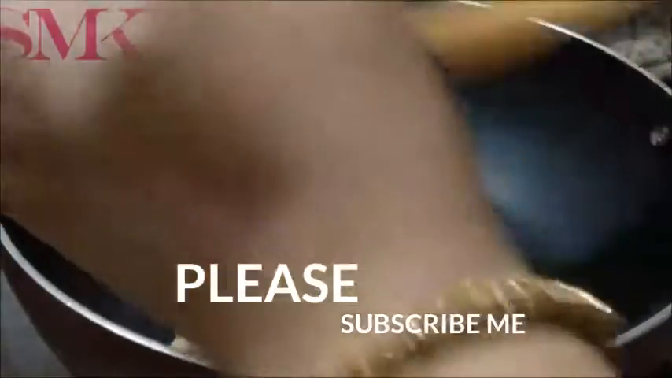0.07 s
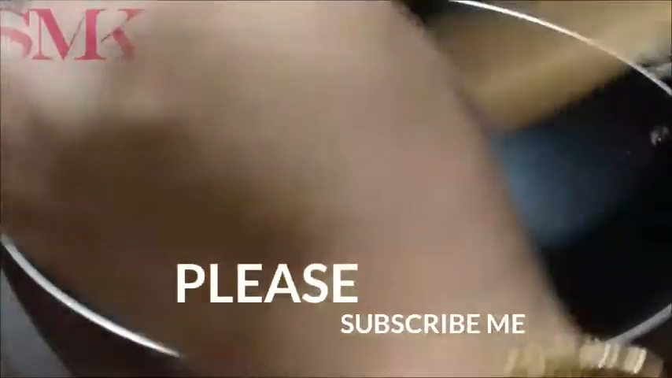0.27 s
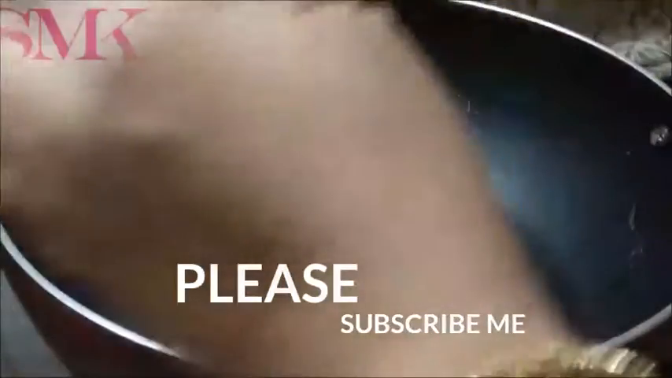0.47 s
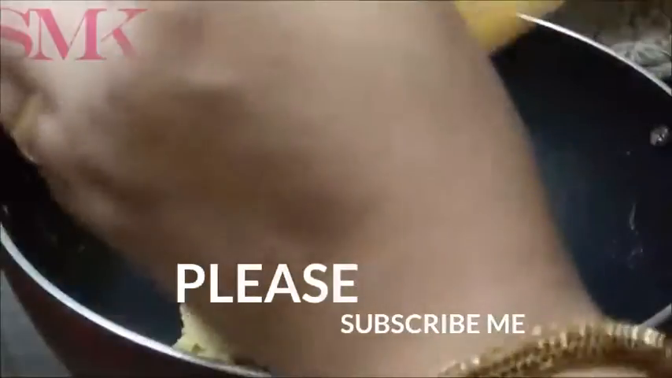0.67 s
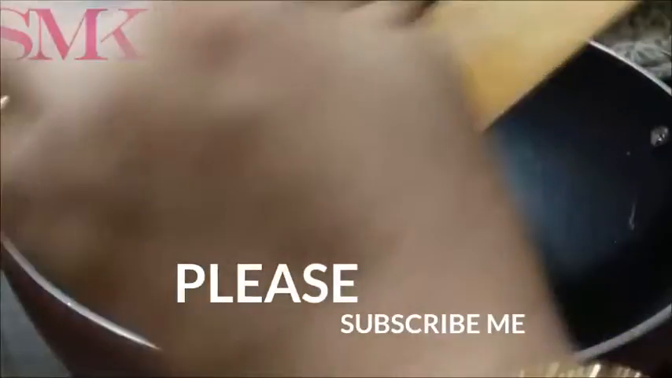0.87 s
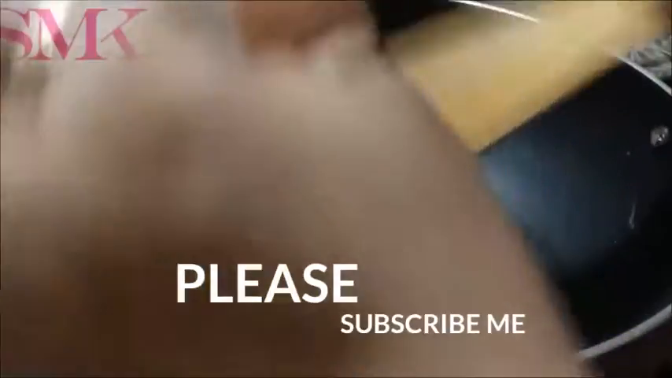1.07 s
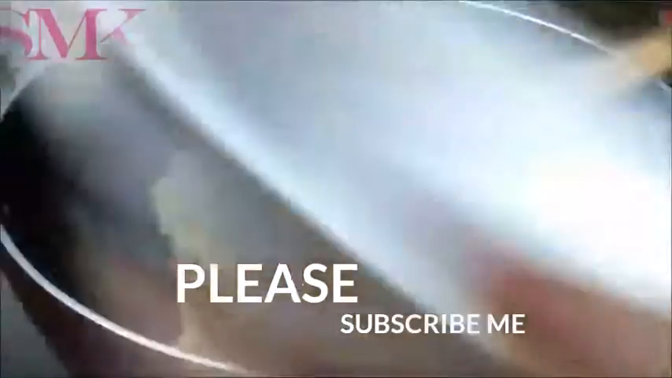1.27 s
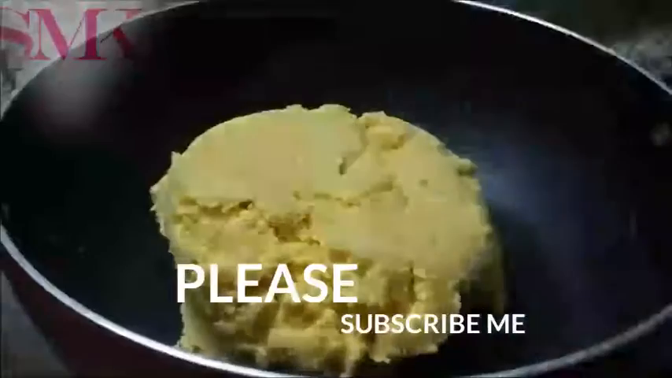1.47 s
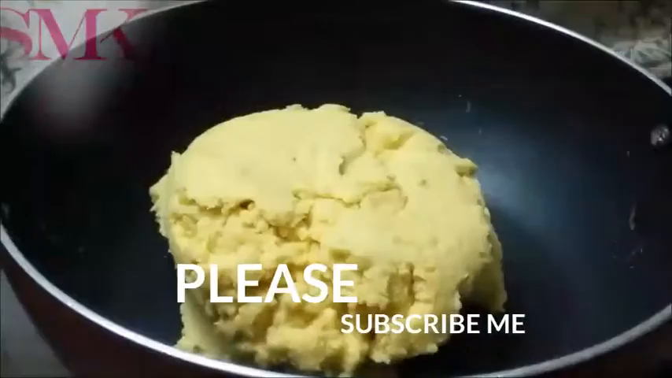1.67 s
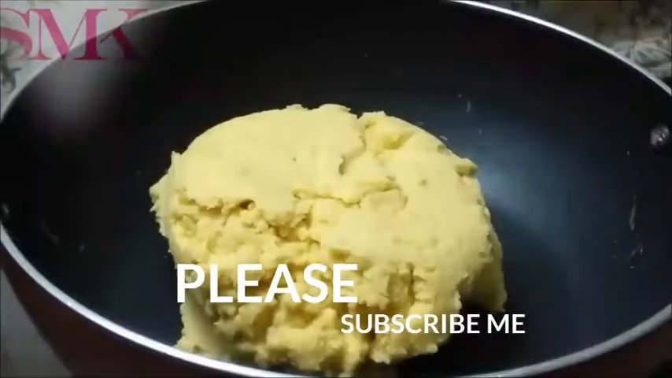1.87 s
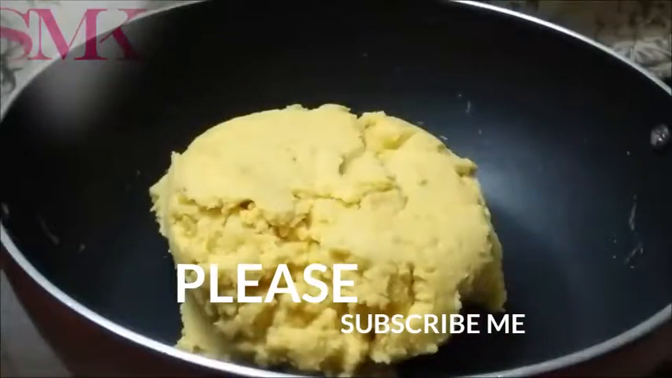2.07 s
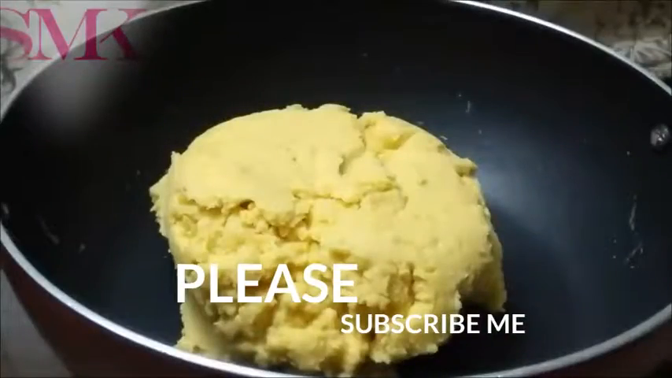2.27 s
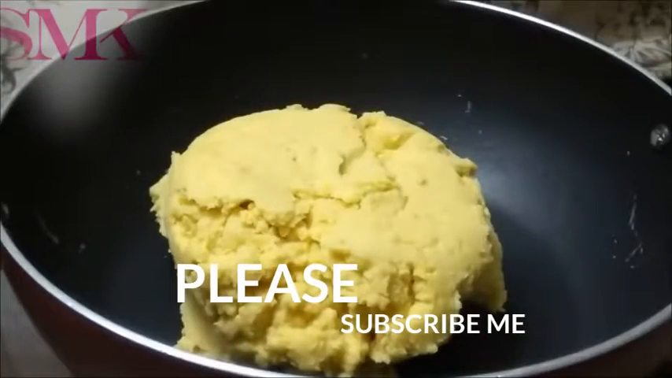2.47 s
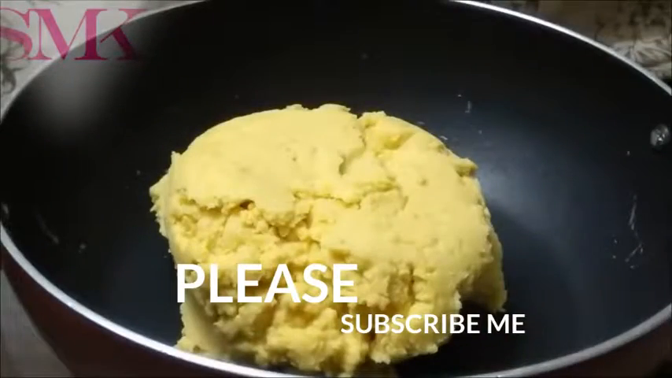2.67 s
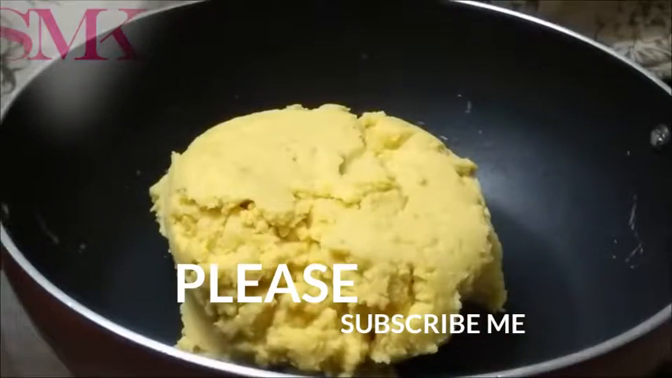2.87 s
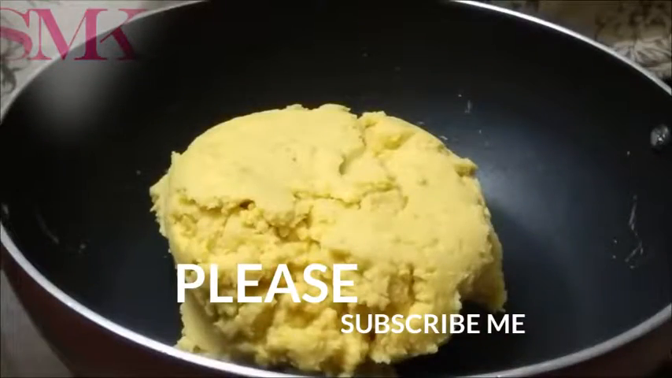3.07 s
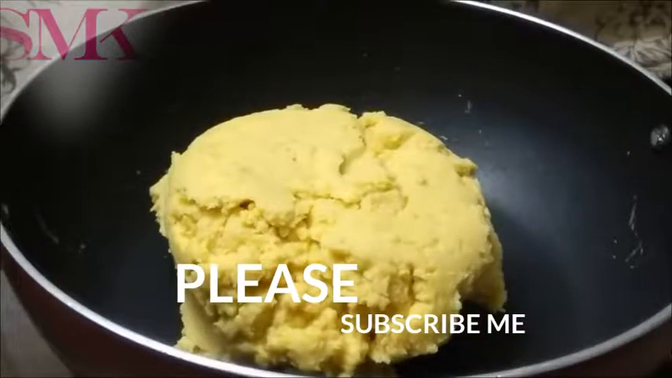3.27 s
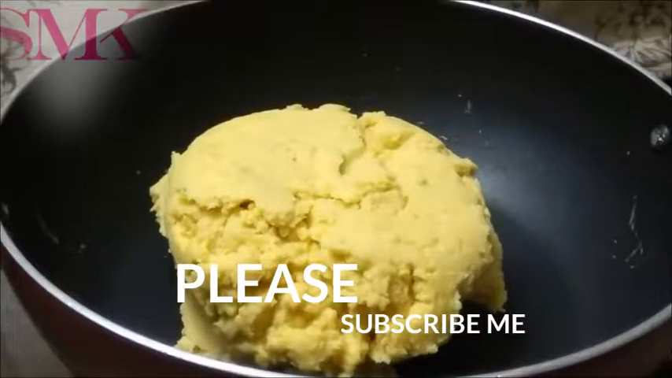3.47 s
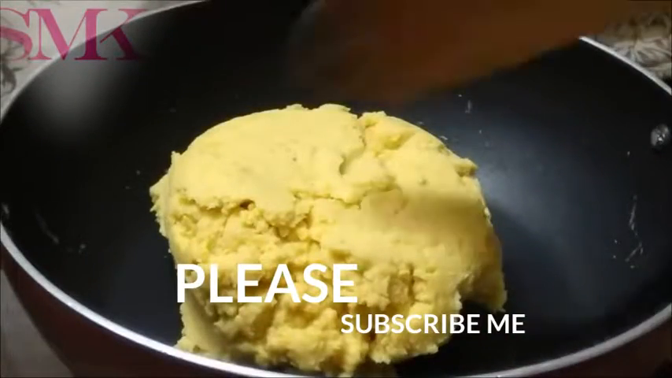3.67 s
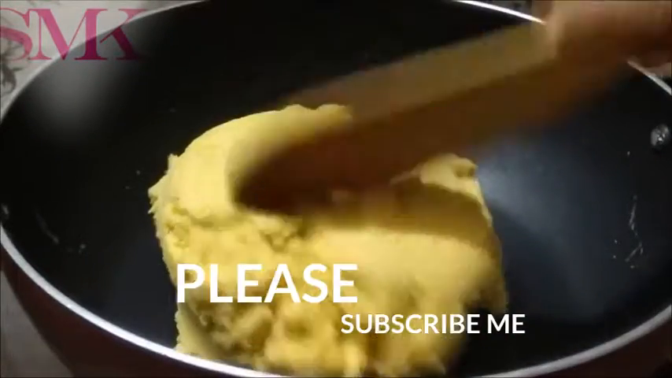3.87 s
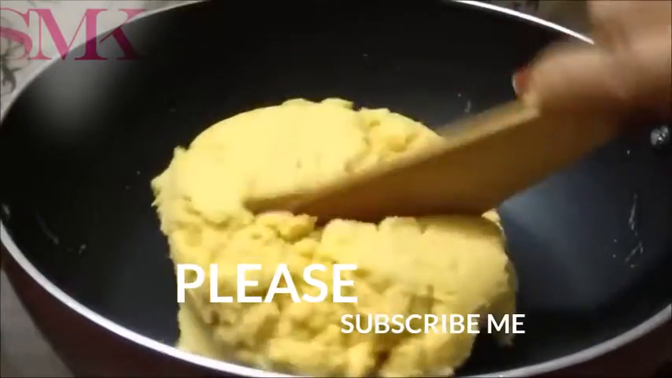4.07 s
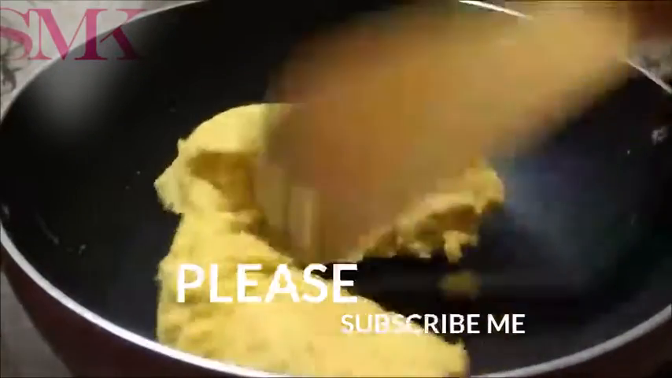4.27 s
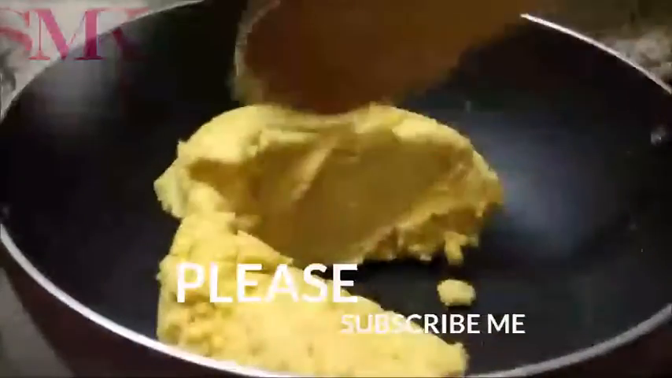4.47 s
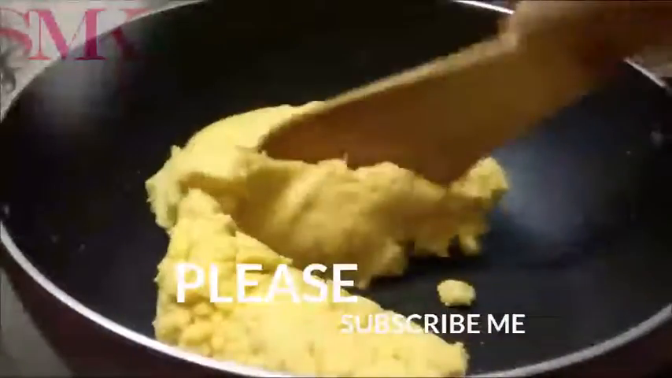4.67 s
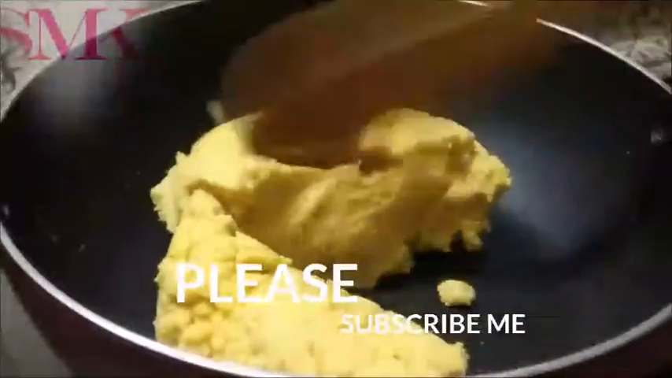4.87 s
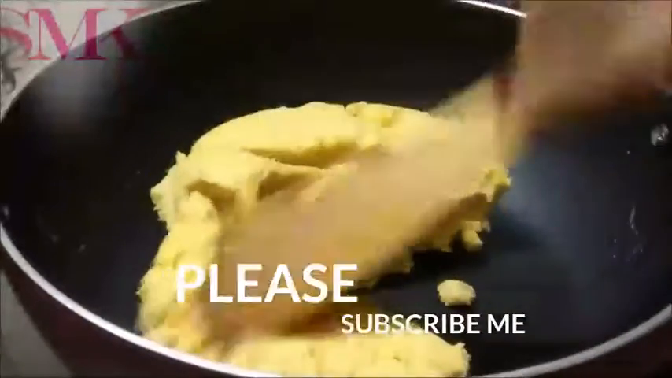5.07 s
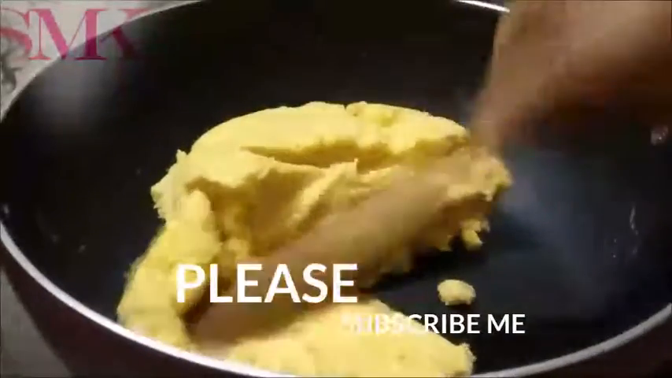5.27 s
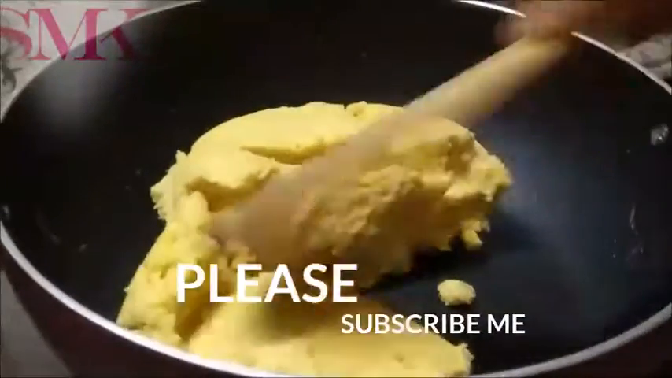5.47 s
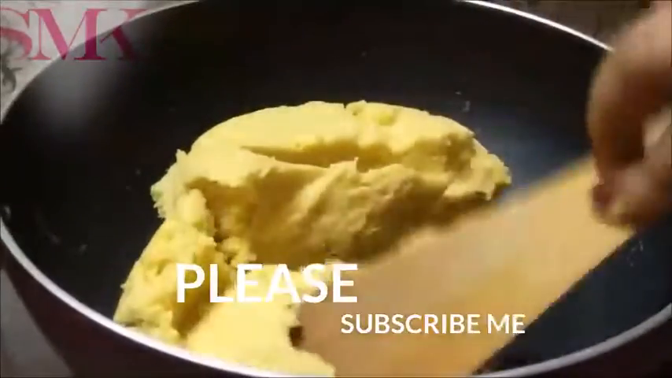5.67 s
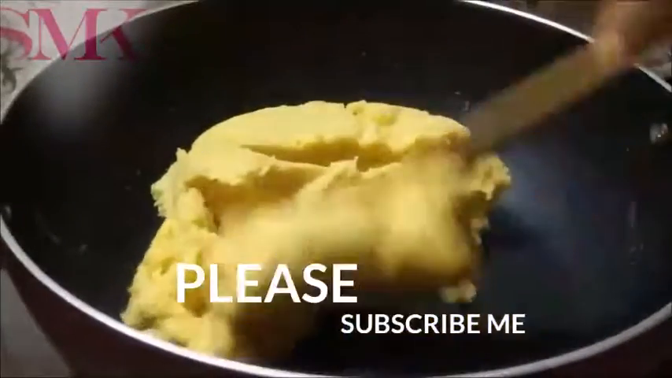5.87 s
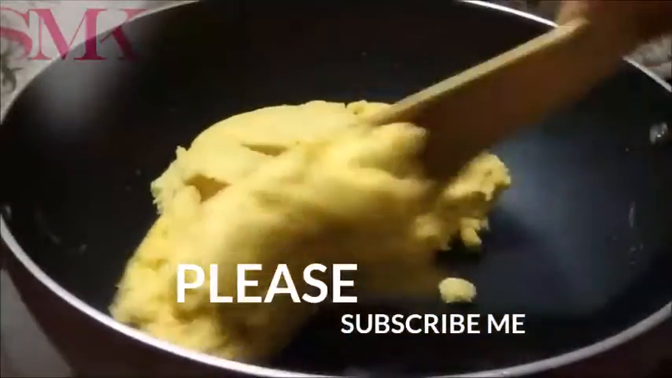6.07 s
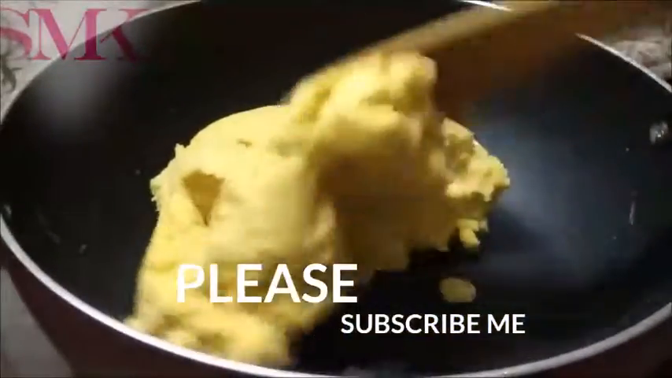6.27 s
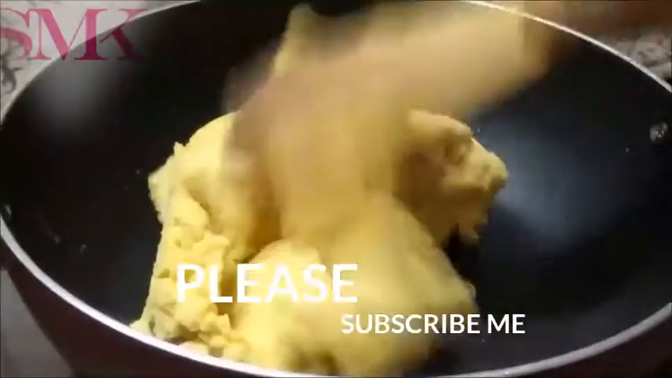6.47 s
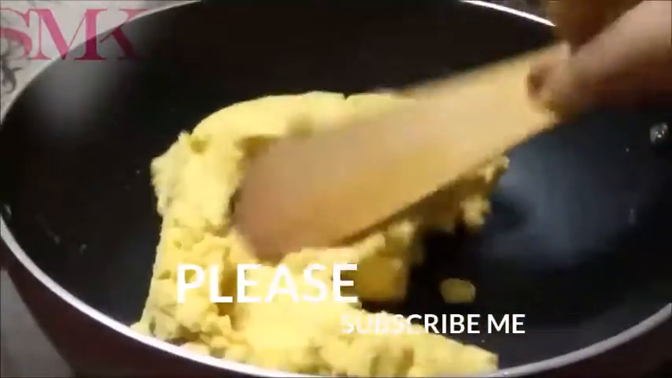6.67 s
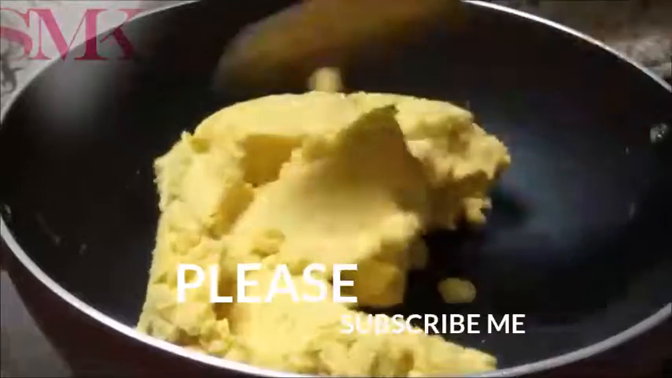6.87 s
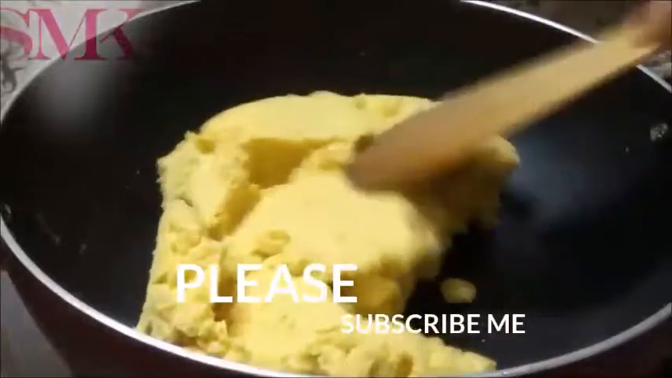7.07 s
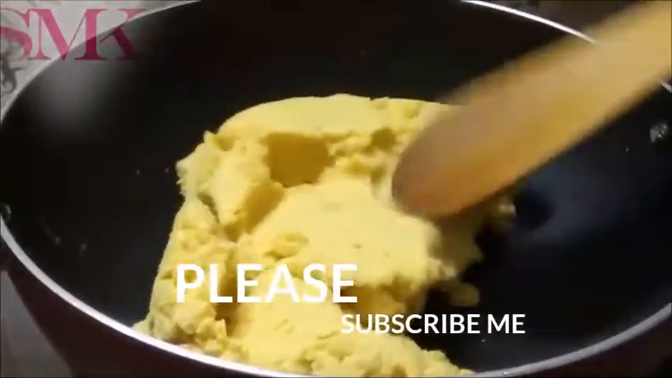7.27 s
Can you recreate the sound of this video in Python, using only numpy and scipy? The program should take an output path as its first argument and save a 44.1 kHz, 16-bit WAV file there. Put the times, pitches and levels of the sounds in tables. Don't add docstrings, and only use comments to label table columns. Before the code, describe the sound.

Close kitchen cooking: hissing paste, one hard wooden rap, two bright steel clanks, a lull, then juddering spatula knocks with bursts of steam.

```python
import sys
import numpy as np
from scipy import signal
from scipy.fft import rfft, irfft, next_fast_len
from scipy.io import wavfile
from scipy.ndimage import uniform_filter1d

SR = 44100
rng = np.random.default_rng(int(sys.argv[2]) if len(sys.argv) > 2 else 0)


def amplitude_ratio(level_db):
    exponent = np.asarray(level_db, float) / 20
    return 10 ** exponent


def put_to_file(sound):
    columns = np.atleast_2d(sound).T
    safe = np.clip(columns, -1, 1)
    whole_steps = np.round(safe * 32767)
    wavfile.write(sys.argv[1], SR, whole_steps.astype(np.int16))


N = 322371
T = np.arange(N) / SR
SLOW = T[::64]

# start in seconds, peak in dB, contact in ms.
SLIPS = [(0.34, -20.5, 0.77), (0.354, -20.5, 1), (0.37, -24.5, 0.89), (4.143, -11.5, 0.14),
         (4.153, -10.5, 0.6), (4.1645, -11, 0.35), (4.174, -15, 0.093), (4.1875, -11, 0.32),
         (4.196, -35, 0.86), (4.2118, -11, 0.44), (4.227, -28, 0.67), (4.243, -29, 0.87),
         (4.281, -12.5, 0.72), (4.293, -15, 0.8), (4.309, -23.5, 0.44), (4.325, -23, 1), (4.362, -24, 0.91),
         (4.813, -28, 0.92), (4.834, -24, 1), (4.9905, -26, 1), (4.993, -18.5, 0.48), (5.003, -35, .7),
         (5.013, -17, 0.61), (5.2585, -28, 0.75), (5.2615, -14.5, 0.97), (5.268, -24, 0.14),
         (5.273, -21, 1), (5.28, -20, 0.68), (5.295, -23.5, 0.56), (5.312, -23.5, 1), (5.427, -21.5, 0.9),
         (5.44, -24, 0.3), (5.468, -16, 0.33), (5.475, -14.5, 0.64), (5.488, -15.5, 0.51),
         (5.499, -17, 0.4), (5.511, -19, 0.83), (5.733, -32, 1), (5.737, -21, 1), (5.745, -19, 0.87),
         (5.767, -18, 0.93), (5.789, -25, 0.79)]
# frequency in Hz, level in dB, t60 in seconds.
PAN_MODES = [(292, -28, 0.028), (390, -8.5, 0.14), (489.4, 0, 0.078), (617.5, 11, 0.13), (725, 5.5, 0.051),
             (864, 11, 0.0093), (1008, 1, 0.016), (1070, 5.5, 0.03), (1241, 4, 0.049), (1404, -14, 0.015),
             (1700, 7, 0.02), (2250, -3, 0.015)]
# end in seconds, lift of the low modes in dB, lift of the high modes in dB.
PAN_SPOTS = [
    (1.0, 6.5, 1),
    (4.2, 0, 1),
    (4.26, 0, 0.5),
    (4.5, 1, 1),
    (4.9, 12, -5),
    (5.1, -1, -2),
    (5.35, -1.5, 3.5),
    (5.6, 8, 0),
    (6.0, 4, -0.5),
]
# from Hz, to Hz.
PAN_BAND_HZ = (370, 1420)
# time in seconds, level in dB.
DRAG = [
    (4.04, -70),
    (4.068, -35),
    (4.092, -35),
    (4.1, -35.5),
    (4.13, -57),
]
# start in seconds, peak in dB, contact in ms.
RAPS = [
    (.5163, 1.5, 0.051),
    (.5188, -7, 0.043),
    (.5212, -10.5, 0.05),
    (.5285, -10, 0.13),
    (.534, -24, 0.16),
]
# frequency in Hz, level in dB, t60 in seconds.
BLADE_MODES = [(403, -26, 0.03), (620, -24, 0.02), (845, -14, 0.018), (1100, -19, 0.015), (1430, 4, 0.03),
               (1560, -1, 0.015), (1780, 2.5, 0.012), (2043, 18, 0.026), (2440, 17.5, 0.012),
               (2920, 1.5, 0.01), (3400, 4, 0.015), (4030, 7.5, 0.015), (4570, 0, 0.013), (5240, -3, 0.012),
               (6800, -28, .008), (9560, -23, 0.0048)]
# start in seconds, peak in dB, contact in ms.
STRIKES = [
    (4.5715, -4, 0.19),
    (4.5738, -13, 0.2),
    (4.586, -15.5, 0.063),
    (4.591, -15, 0.59),
    (4.598, -27, 0.41),
    (4.617, -22, 0.88),
    (4.637, -23.5, 0.78),
    (5.2685, -30, 0.1),
]
# frequency in Hz, level in dB, t60 in seconds.
FLOOR_MODES = [(420, -18.5, 0.027), (617, -12, 0.095), (747, -4, 0.0091), (1212, 0, 0.012),
               (1475, -5.5, 0.038), (1674, -2, 0.022), (2250, 6.5, 0.0036), (2510, 2.5, 0.003),
               (3040, -10, 0.01), (4330, -19.5, 0.022)]
# start in seconds, peak in dB, contact in ms.
CLANKS = [(2.6727, 2.5, 0.025), (2.6808, -11.5, 0.053), (2.691, -13, 0.066), (2.698, -26.5, 0.043),
          (2.709, -12, 0.028), (2.727, -21, 0.14), (2.7605, 0, 0.056), (2.769, -17.5, 0.19),
          (2.7825, -10, 0.14), (2.791, -22.5, 0.043), (2.82, -14, 0.033)]
# frequency in Hz, level in dB, t60 in seconds.
STEEL_MODES = [(344, -32.5, 0.024), (477, -11, 0.036), (627, -2.5, 0.015), (836, -12, 0.037),
               (960, -11, .03), (1190, -6.5, 0.12), (1300, -6.5, 0.1), (1540, -3.5, 0.037),
               (1783, -8.5, 0.04), (1936, -4, 0.012), (2030, -9, 0.019), (2402, -1, 0.11),
               (2484, -5.5, 0.055), (2586, -5.5, 0.013), (4100, 1.5, 0.012), (3900, -7, 0.05),
               (4047, -3, 0.11), (4220, -4, 0.12), (4370, -6, 0.0086), (5380, -17.5, 0.04),
               (6550, -4, 0.0066), (6660, -10.5, 0.046), (6950, -16.5, 0.036), (9160, -19.5, 0.036),
               (11100, -12.5, 0.011)]
# from Hz, to Hz.
STEEL_HOLLOWS = [
    (2800, 3650),
    (4700, 5200),
]
# start in seconds, hold in seconds, steam hiss in dB, rubbing in dB.
PRESSES = [(0, 0.16, -36.5, -41.5), (0.211, 0.12, -41, -46), (0.358, 0.3, -46, -43), (.6, 0.64, -63, -51),
           (0.946, 0.23, -40, -46), (1.188, 0.055, -36, -55), (1.27, 0.074, -38, -48),
           (1.535, 0.056, -45, -43), (1.65, 0.27, -48, -59), (1.86, 0.03, -54, -52.5),
           (2.412, .04, -45, -58), (2.939, 0.12, -67, -51.5), (3.119, 0.043, -54, -52),
           (3.33, 0.013, -37, -50), (3.745, 0.16, -31, -38), (4.02, 0.1, -33.5, -38.5),
           (4.15, 0.2, -38.5, -44.5), (4.403, 0.16, -33.5, -39.5), (4.6, 0.14, -41, -54),
           (4.75, 0.14, -46, -57), (4.973, 0.11, -33.5, -42.5), (5.1, 0.17, -36, -45.5),
           (5.501, 0.12, -37, -50.5), (5.75, 0.42, -38, -52.5), (6.22, 0.029, -35.5, -47),
           (6.33, 0.02, -34, -46), (6.418, 0.16, -33.5, -40), (6.6, 0.13, -35.5, -48),
           (6.964, 0.13, -39.5, -47), (7.201, 0.17, -39, -49.5)]
# frequency in Hz, density in dB per Hz.
STEAM_COLOUR = [(3000, -30.5), (5000, -31), (7700, -24.5), (8500, -15), (11000, -10), (14800, -5),
                (15600, -0.5), (16000, -30.5), (16500, -73)]
# frequency in Hz, density in dB per Hz.
RUB_COLOUR = [(900, -19), (1500, -17.5), (2000, -13), (2500, -9), (3500, -5), (5000, -5.5), (7000, -1.5),
              (9000, -8), (12000, -7)]
# start in seconds, peak in dB, dull part minus bright part in dB.
POPS = [(0.018, -25, -13), (0.12, -20, -7), (0.238, -25, -23.5), (0.368, -30, 2), (0.38, -24.5, 0.5),
        (0.4497, -23, -4), (0.508, -36, -6), (0.4702, -23, -1.5), (0.8883, -34, -7.5), (1.2067, -21, -16),
        (1.3203, -21.5, -44), (1.673, -19.5, -10.5), (1.7333, -20.5, -9), (1.8753, -30, -13),
        (2.425, -27, -21), (2.4384, -31, -32.5), (3.7857, -34, -39), (3.8352, -6, -24), (3.8425, -14, -18),
        (3.869, -24, -20), (3.879, -18, -18), (3.883, -22, -18), (3.8753, -18, -7.5), (4.308, -21.5, -5),
        (4.4327, -39, -34), (4.444, -30, -9), (4.53, -26, -5), (4.551, -16.5, -8), (4.664, -26, -18),
        (4.81, -23, -33), (4.99, -23, -38), (6.2546, -35, -7), (6.312, -35, -16), (6.6891, -29, -18),
        (6.7295, -24, -24)]
# start in seconds, peak in dB, dull part minus bright part in dB.
CRACKS = [
    (.5163, -17, -3),
    (2.6727, -14, -3),
    (2.7605, -16, -3),
]
# frequency in Hz, density in dB per Hz.
ROAR_COLOUR = [(18, -77), (30, -49.5), (140, -21.5), (198, -8.5), (286, -0.5), (382, -2.5), (490, -18),
               (520, -9), (583, -10.5), (735, -38), (1310, -19), (1530, -44.5), (1960, -22.5), (2290, -66),
               (3000, -26), (3900, -60.5), (6600, -120)]
# time in seconds, change in dB.
GUSTS = [(.05, -2.5), (.27, -7.5), (.46, -0.5), (.7, -3.5), (.78, 0), (.86, 4), (1.0, 1.5), (1.13, 1),
         (1.28, 0.5), (1.47, -5.5), (1.611, -0.5), (1.8, -3.5), (1.951, 0.5), (2.15, -3), (2.3, -3),
         (2.37, -2), (2.44, 3), (2.6, -8), (2.999, -5), (3.149, -2), (3.303, -2.5), (3.451, -1.5),
         (3.571, 3.5), (3.69, -2.5), (3.82, 4), (3.97, 5), (4.1, 1), (4.43, 0.5), (4.648, 4), (4.85, 4),
         (5.12, 3.5), (5.2, 0), (5.38, 2.5), (5.65, 2), (5.83, 0.5), (5.96, 3.5), (6.1, 0.5), (6.211, -5.5),
         (6.32, -1.5), (6.4, -0.5), (6.5, -2), (6.62, -2), (6.73, 5.5), (6.93, -3.5), (7.1, 0.5), (7.2, 1),
         (7.3, -1.5)]
# time in seconds, level in dB.
DRAUGHT = [(0.0, -68), (0.73, -56.5), (1.44, -67), (1.68, -55), (2.25, -65), (2.44, -56), (2.6, -63),
           (2.91, -57.5), (3.05, -80), (3.62, -55), (3.68, -75), (3.8, -46.5), (3.96, -71), (4.2, -58),
           (4.42, -61), (4.65, -51), (5.2, -71), (5.33, -56), (5.67, -70), (5.79, -48), (6.04, -63.5),
           (6.34, -46.5), (6.44, -58.5), (7.3, -59)]
# frequency in Hz, t60 in seconds.
KITCHEN_T60 = [(350, 0.43), (1000, 0.42), (2500, 0.36), (5000, 0.39), (10000, 0.33)]
# frequency in Hz, left-right correlation.
PORT_LIKENESS = [(60, 0.91), (300, 1), (520, 0.92), (1200, 0.88), (4000, 0.99), (8000, 0.62), (14000, 0.74)]
# frequency in Hz, left minus right in dB.
PORT_LEAN = [(60, -1.5), (400, 2), (2000, 0.9), (4000, 2), (8000, -0.8), (13000, 2.5)]
# frequency in Hz, margin in spreads of chance.
KEPT_MARGIN = [(600, 4), (1300, 2.4), (1600, 1.1), (2000, 1.6), (2500, .6), (3700, .1), (4300, .9),
               (6000, .2), (8000, -.6), (8500, 1), (9100, -.3), (9700, 1), (10800, 0), (13500, 1.8)]

ATTACK_S, STEAM_FALL_DB_PER_S, RASP_FALL_DB_PER_S = 0.035, 111.5, 78.5
FRY_DB, FRY_RASP_DB = -41.5, -60.5
PAN_LEAK_DB, SMEAR_S = -4, 0.012
FLAME_DB, GUST_S = -42.5, 0.059
GATE_S, GATE_FADE_S = 0.45, 0.24
BASS_CUT_HZ, TOP_HZ = 212, 15700
DUCK_FROM_S, DUCK_UNTIL_S, DUCK_DB, DUCK_SLEW_S = 2.93, 3.73, -4, 0.0222


def curve(table):
    return np.interp(T, *np.transpose(table))


def at(table, hz):
    known_hz, value = np.transpose(table)
    return np.interp(np.log(np.maximum(hz, 1)), np.log(known_hz), value)


def walk(rate):
    k = int(SR / rate)
    held = np.repeat(rng.standard_normal(N // k + 1), k)
    return 4 / 3 * uniform_filter1d(uniform_filter1d(held, k), k)[:N]


def band(x, lo_hz, hi_hz):
    return signal.sosfilt(signal.butter(2, [lo_hz, min(hi_hz, .45 * SR)], "band", fs=SR, output="sos"), x)


def ring(modes, contact_ms, scatter_db, detune, longest_s, sense):
    hz, db, t60 = np.repeat(np.transpose(modes), 3, axis=1)[:, :, None]
    chance = rng.standard_normal((2, len(hz), 1))
    t = np.arange(SR // 8) / SR
    sign = sense ** (np.arange(len(hz)) // 3)[:, None]
    level = sign * amplitude_ratio(db + scatter_db * chance[0])
    fade = np.exp(-np.log(1000) * t / np.minimum(t60, longest_s))
    swing = np.sin(2 * np.pi * hz * (1 + detune * chance[1]) * t)
    free = np.sum(level * fade * swing, axis=0)
    phase = (np.arange(128) + .5) / SR * 1000 / max(contact_ms, .03)
    push = np.sin(np.pi * np.clip(phase, 0, 1))
    out = np.convolve(free, push)[:len(t)]
    return out / np.abs(out).max()


def blows(events, modes, scatter_db, detune, longest_s, sense):
    out = np.zeros(N + SR)
    for s, db, ms in events:
        i = int(s * SR)
        out[i:i + SR // 8] += amplitude_ratio(db) * ring(modes, ms, scatter_db, detune, longest_s, sense)
    return out[:N]


def blade_judder():
    slips, start = np.zeros(N), 0
    hz = np.array(PAN_MODES)[:, 0]
    for until, low_db, high_db in PAN_SPOTS:
        lift = low_db * (hz < 550) + high_db * (hz > 800)
        modes = np.array(PAN_MODES) + np.outer(lift, [0, 1, 0])
        run = [row for row in SLIPS if start <= row[0] < until]
        slips = slips + blows(run, modes, 3.5, .012, .12, sense=1.)
        start = until
    smear = rng.standard_normal(2000) * np.exp(-np.arange(2000) / SR / SMEAR_S)
    leak = signal.fftconvolve(band(slips, 1700, 2600), smear / np.linalg.norm(smear))[:N]
    body = signal.sosfilt(signal.butter(4, PAN_BAND_HZ, "band", fs=SR, output="sos"), slips)
    return amplitude_ratio(PAN_LEAK_DB) * leak + amplitude_ratio(1) * body


def blade_drag():
    slips = (rng.random(N) < 2500 / SR) * rng.standard_normal(N)
    response = ring(FLOOR_MODES, 0.14, 7.8, 0.023, 0.028, sense=-0.61)[:900]
    drag = band(signal.fftconvolve(slips, response)[:N], 930, 3400)
    touching = (T > DRAG[0][0]) * (T < DRAG[-1][0])
    return drag / drag.std() * amplitude_ratio(curve(DRAG)) * touching


def blade_raps():
    return blows(RAPS, BLADE_MODES, 1.5, .04, .025, sense=1.)


def floor_strikes():
    return blows(STRIKES, FLOOR_MODES, 1.5, .04, .06, sense=-0.99)


def steel_utensil():
    steel = blows(CLANKS, STEEL_MODES, 2.5, .009, .04, sense=-0.99)
    for edges in STEEL_HOLLOWS:
        steel = signal.sosfilt(signal.butter(2, edges, "bandstop", fs=SR, output="sos"), steel)
    return steel


def hiss(colour, grain_rate, grain_db, grain_share, flicker_db, flicker_rate, count):
    size = next_fast_len(N)
    hz = np.fft.rfftfreq(size, 1 / SR)
    grain_level = amplitude_ratio(grain_db * np.minimum(rng.exponential(size=N), 4))
    grains = (rng.random(N) < grain_rate / SR) * grain_level * rng.standard_normal(N)
    flow = rng.standard_normal(N)
    mid = np.sqrt(1 - grain_share) * flow + np.sqrt(grain_share) * grains / grains.std()
    like = np.clip(at(PORT_LIKENESS, hz), 0, 1)
    mid = rfft(mid, size) * np.sqrt(1 + like)
    side = rfft(rng.standard_normal(N), size) * np.sqrt(1 - like)
    gain = amplitude_ratio(at(colour, hz))
    both = gain * np.array([mid + side, mid - side])
    out = np.zeros((2, N))
    for octave in np.arange(5, 15, 1 / count):
        window = np.clip(1 - count * np.abs(np.log2(hz + 1) - octave), 0, 1)
        if np.max(window * gain) > .01:
            out = out + amplitude_ratio(flicker_db * walk(flicker_rate)) * irfft(both * window, size)[:, :N]
    return out / out.std()


def pressed(rest_db, fall_db_per_s, column):
    rows = np.array(PRESSES)[:, :, None]
    start, held = rows[:, 0], rows[:, 1]
    fall_db = fall_db_per_s * np.clip(SLOW - start - held, 0, 1)
    each = np.clip((SLOW - start) / ATTACK_S, 0, 1) * amplitude_ratio(rows[:, column] - fall_db)
    return np.interp(T, SLOW, np.sqrt(amplitude_ratio(2 * rest_db) + np.sum(each ** 2, axis=0)))


def steam_pops():
    pops, t = np.zeros(N + 400), np.arange(400) / SR
    for s, db, dull_db in POPS + CRACKS:
        burst = rng.standard_normal(400) * np.exp(-t / .001)
        bright, dull = band(burst, 9800, 17000), band(burst, 2500, 7000)
        snap = bright / np.abs(bright).max() + amplitude_ratio(dull_db) * dull / np.abs(dull).max()
        pops[int(s * SR):int(s * SR) + 400] += amplitude_ratio(db) * snap
    return pops[:N]


def paste():
    sputter = amplitude_ratio(1.0 * walk(200) + .8 * walk(30))
    steam = hiss(STEAM_COLOUR, 2300, 2.6, .5, 0.94, 45, count=1)
    steam = steam * pressed(FRY_DB, STEAM_FALL_DB_PER_S, column=2)
    rasp = hiss(RUB_COLOUR, 1200, 2.6, .5, 2.5, 25, count=1)
    rasp = rasp * pressed(FRY_RASP_DB, RASP_FALL_DB_PER_S, column=3)
    return sputter * (amplitude_ratio(0.5) * steam + amplitude_ratio(2.0) * rasp) + steam_pops()


def burner():
    level_db = FLAME_DB + sum(db * np.exp(-((SLOW - s) / GUST_S) ** 2) for s, db in GUSTS)
    roar = hiss(ROAR_COLOUR, 300, 1.5, .2, 2.8, 7, count=2) * np.interp(T, SLOW, amplitude_ratio(level_db))
    deep = band(band(rng.standard_normal(N), 120, 210), 40, 220)
    rumble = amplitude_ratio(curve(DRAUGHT) - 1.0) * deep / deep.std()
    buffet = amplitude_ratio(1.8 * walk(14))
    return buffet * (roar + rumble)


def kitchen(x, wet_db, gap_ms, spread, dull_hz, lasting):
    t = np.arange(SR // 2) / SR
    noise = rng.standard_normal((3, len(t)))
    noise = noise[0] + spread * band(noise[1:], 950, 16000)
    tail = np.zeros((2, len(t)))
    for hz, t60 in KITCHEN_T60:
        tail += band(noise, hz / 1.506, hz * 1.63) * np.exp(-np.log(1000) * t / t60 / lasting)
    tail = tail * np.clip(t * 1000 / gap_ms - .5, 0, 1)
    tail = tail * np.clip((GATE_S - t) / GATE_FADE_S, 0, 1)
    tail = tail / np.sqrt(np.mean(np.sum(tail ** 2, axis=1)))
    tail = signal.sosfilt(signal.butter(1, dull_hz, fs=SR, output="sos"), tail)
    x = signal.sosfilt(signal.butter(4, BASS_CUT_HZ, "high", fs=SR, output="sos"), x)
    return x + amplitude_ratio(wet_db) * signal.fftconvolve(x[None], tail, axes=1)[:, :N]


def scene():
    near, far = .3, 1.15
    hits = kitchen(blade_judder(), -0.59, 0.75, near, 900, 0.87) + blade_drag_in_room(near)
    hits = hits + kitchen(blade_raps(), -0.36, 2.4, far, 2200, 0.89)
    hits = hits + kitchen(floor_strikes(), -4.5, 3.1, far, 2700, 0.92)
    hits = hits + kitchen(steel_utensil(), -2.0, 4.0, far, 6200, 0.99)
    return hits + paste() + burner()


def blade_drag_in_room(spread):
    return kitchen(blade_drag(), -0.59, 0.75, spread, 900, 0.87)


def mute_weak_bands(x, per_db, bias, depth_db):
    hz, _, z = signal.stft(x, SR, nperseg=1024)
    bands, frames = 103, z.shape[2]
    power = np.sum(np.abs(np.pad(z, ((0, 0), (0, 2), (0, 0)))) ** 2, axis=0)
    power = power.reshape(bands, 5, frames).sum(axis=1)
    level = 10 * np.log10(uniform_filter1d(power, size=5, axis=1) + 1e-18)
    luck = uniform_filter1d(rng.standard_normal((bands, frames)), size=9, axis=1) * 3
    margin = at(KEPT_MARGIN, hz[2::5])[:, None] + bias * rng.standard_normal((bands, 1))
    margin = margin + per_db * (level - np.median(level, axis=1, keepdims=True)) + luck
    total = power.sum(axis=0)
    struck = uniform_filter1d(1. * (total > 8 * np.roll(total, 2)), size=5) > 0
    gain = np.where((margin > 0) | struck, 1, amplitude_ratio(depth_db))
    gain = np.repeat(gain, 5, axis=0)[:len(hz)]
    return signal.istft(z * gain, SR, nperseg=1024)[1][:, :N]


def top_cut(x):
    return signal.sosfilt(signal.butter(12, 16710, fs=SR, output="sos"), x)


def record(dry):
    size = next_fast_len(N)
    lean = at(PORT_LEAN, np.fft.rfftfreq(size, 1 / SR)) / 2
    ports = irfft(rfft(dry, size) * amplitude_ratio(np.array([lean, -lean])), size)[:, :N]
    sag = np.clip(np.minimum(T - DUCK_FROM_S, DUCK_UNTIL_S - T) / DUCK_SLEW_S, 0, 1)
    ports = np.tanh(0.84 * ports * amplitude_ratio(DUCK_DB * sag)) / 0.77
    ports = signal.sosfilt(signal.ellip(8, .2, 60, TOP_HZ, fs=SR, output="sos"), ports)
    mix = mute_weak_bands(ports, per_db=.06, bias=.5, depth_db=-35)
    return top_cut(mix)


dry = scene()
out = record(dry)
put_to_file(out)
```